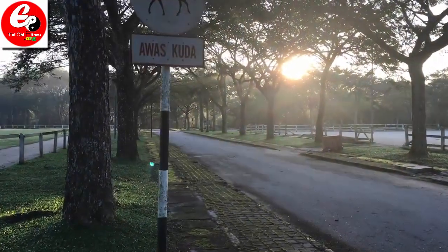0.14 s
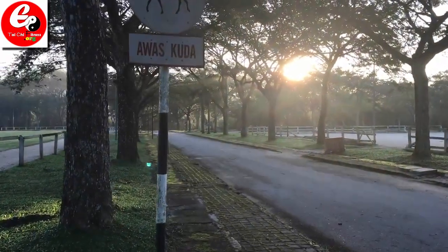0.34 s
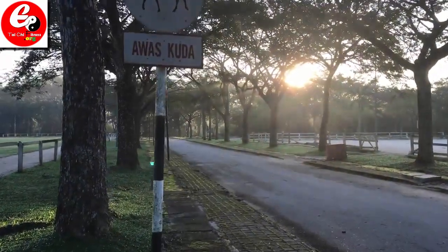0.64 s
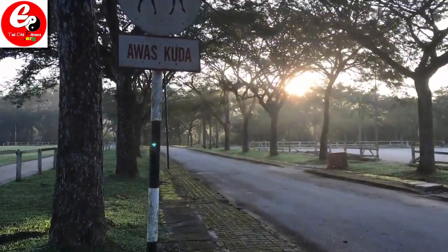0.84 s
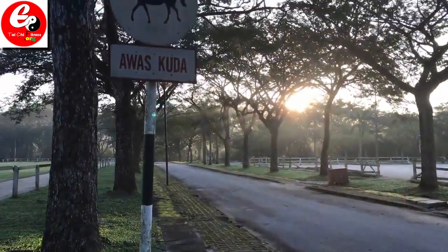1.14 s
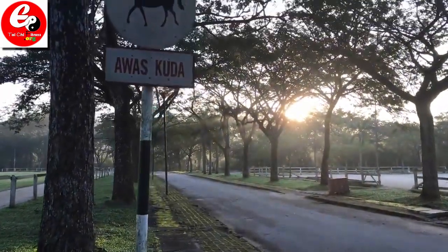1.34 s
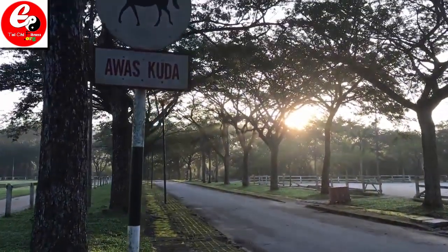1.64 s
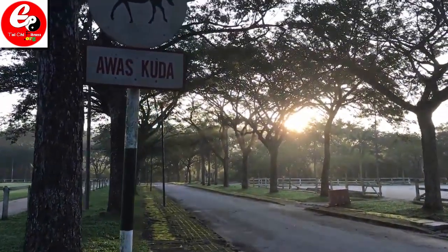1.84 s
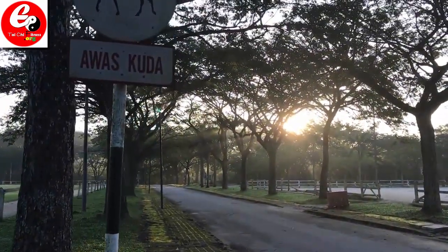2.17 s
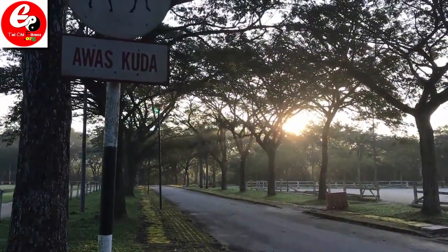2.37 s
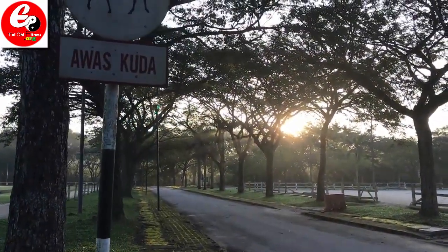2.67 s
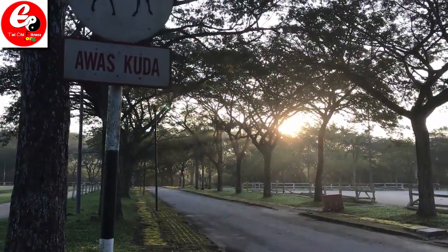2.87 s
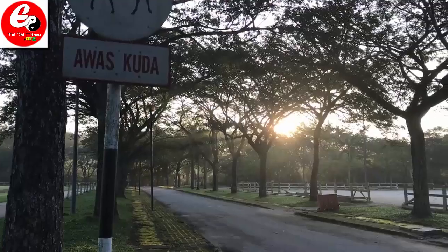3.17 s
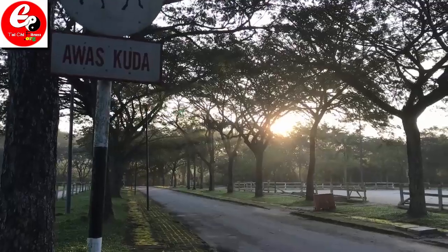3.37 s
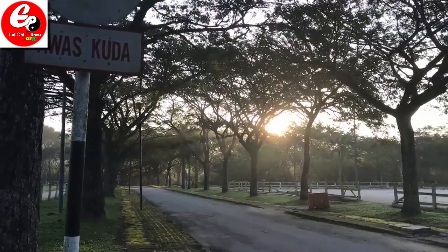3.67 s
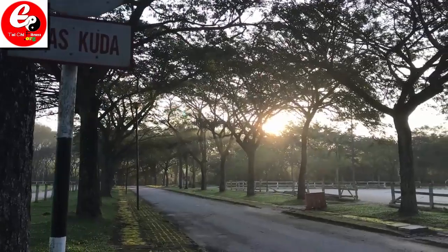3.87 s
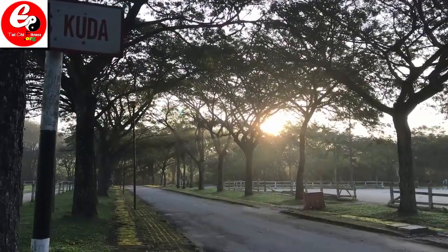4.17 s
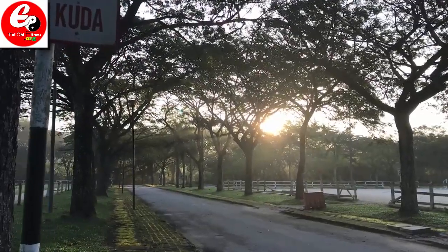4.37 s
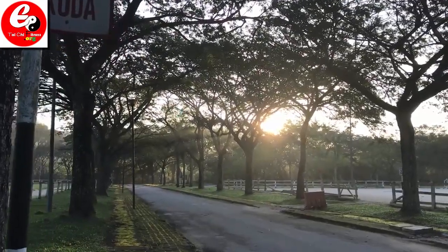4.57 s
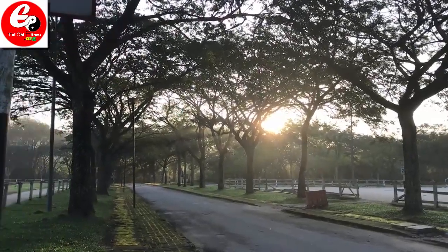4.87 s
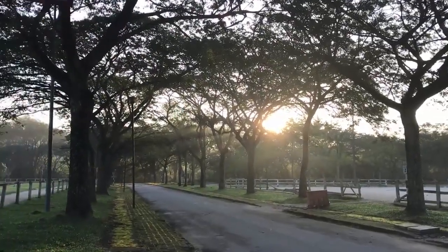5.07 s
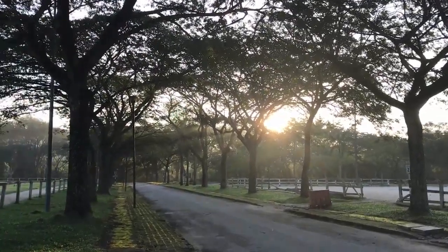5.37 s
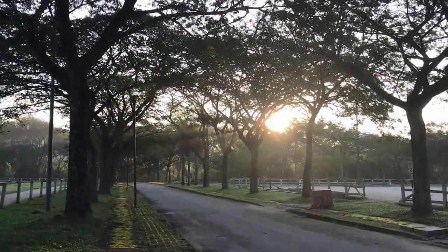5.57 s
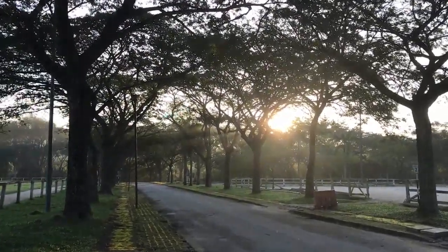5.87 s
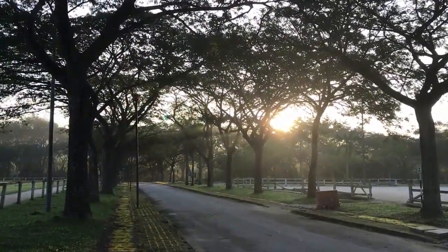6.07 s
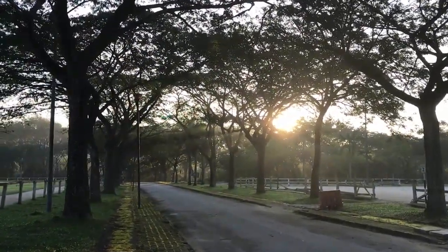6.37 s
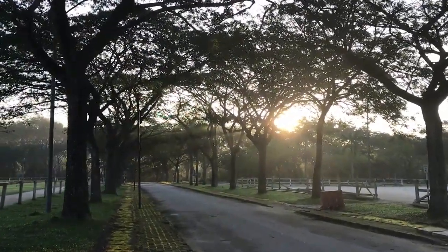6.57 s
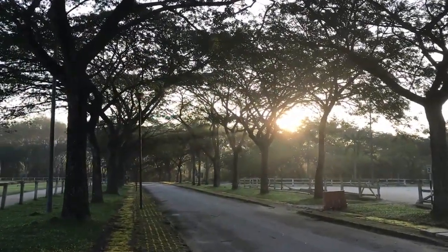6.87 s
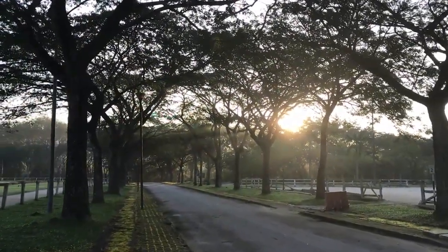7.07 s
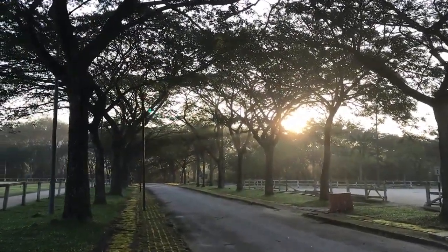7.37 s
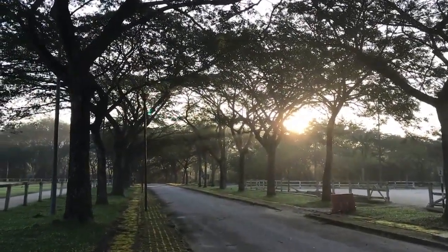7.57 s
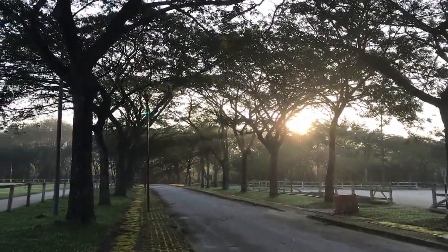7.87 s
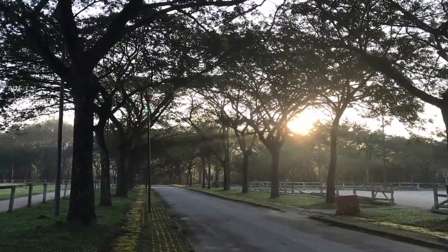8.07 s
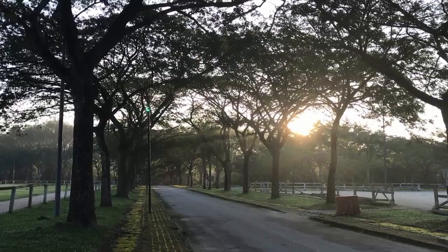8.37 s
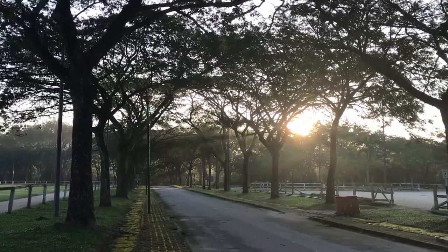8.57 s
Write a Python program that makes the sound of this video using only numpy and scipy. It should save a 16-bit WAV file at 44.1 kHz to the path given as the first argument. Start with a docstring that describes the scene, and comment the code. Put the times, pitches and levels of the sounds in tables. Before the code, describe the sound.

Dawn birdsong of short gliding whistles and chirps, near and far, with rasping bush crickets, soft air hiss, faint dry ticks and steady far traffic.

```python
"""Many small birds whistle and chirp at dawn on a tree-lined lane: gliding tones, scattered by the trees.
Two bush crickets buzz near 9 and 10 kHz, as trains of rasping wing strokes, and fall silent.
Shaped noise makes far insects that carry on, a swelling hiss near 7 kHz, open air and distant traffic.
Decaying noise bursts make small dry ticks close by and thin clicks at the top of the treble."""
import sys
import numpy as np
from scipy import signal
from scipy.fft import rfft, irfft
from scipy.io import wavfile
from scipy.ndimage import map_coordinates

SR = 44100
rng = np.random.default_rng(int(sys.argv[2]) if len(sys.argv) > 2 else 0)


def generate_wav(signal):
    """Clip the signal to [-1, 1] and save it as 16-bit WAV at the path in sys.argv[1]."""
    frames = np.transpose(np.atleast_2d(signal))
    scaled = np.clip(frames, -1, 1) * 32767
    pcm = np.round(scaled).astype(np.int16)
    wavfile.write(sys.argv[1], SR, pcm)


N = 384993
T = np.arange(N) / SR


def gain_of(db):
    """Decibels to amplitude."""
    return 10 ** (np.asarray(db) / 20)


def evened(x):
    """Scales to rms 1."""
    return x / np.sqrt(np.mean(x ** 2) + 1e-20)


def follow(rows, axis=1):
    """One column of a curve, interpolated at every sample."""
    rows = np.asarray(rows)
    return np.interp(T, rows[:, 0], rows[:, axis])


def add(mix, start_s, sound):
    """Mixes a sound in at its start time."""
    part = mix[max(round(start_s * SR), 0):][:len(sound)]
    part += sound[:len(part)]


def coloured(x, spectrum):
    """Filters by a spectrum, interpolated over log frequency, to rms 1."""
    hz, db = np.transpose(spectrum)
    f = np.fft.rfftfreq(len(x), 1 / SR)
    response = gain_of(np.interp(np.log(f + 1), np.log(hz + 1), db))
    return evened(irfft(rfft(x) * response, len(x)))


def wander(t, per_s):
    """Smooth random curve through normal knots, per_s of them a second."""
    knots = rng.standard_normal(4096)
    return map_coordinates(knots, [t * per_s], order=2, mode="wrap")


def trees(x, t60_s, wet_db, onset_s=0.0078):
    """Trunks and crowns scatter a sound into a sparse, dying tail."""
    t = np.arange(SR) / SR
    taps = rng.standard_normal(SR) * (rng.random(SR) < .06)
    tail = taps * (1 - np.exp(-t / onset_s)) * gain_of(-60 * t / t60_s)
    scattered = signal.fftconvolve(x, tail / np.linalg.norm(tail))[:N]
    return x + gain_of(wet_db) * scattered


def progress(length_s):
    """Runs from 0 to 1 over a note."""
    return np.linspace(0, 1, round(max(length_s, .01) * SR))


def whistle(glide_hz, loudest, rough, waver=0.0033, rough_waver=0.021,
            flutter_db=1.9, rough_flutter_db=3, edge=0.44, overtone_db=-38):
    """A tone follows its glide, swells and fades; roughness trembles its pitch and level."""
    t = np.arange(len(glide_hz)) / SR
    u = t / t[-1]
    hz = glide_hz * (1 + (waver + rough * rough_waver) * wander(t, 416))
    phase = 2 * np.pi * np.cumsum(hz) / SR
    half_turns = np.interp(u, [0, np.clip(loudest, .1, .9), 1], [0, .5, 1])
    swell = abs(np.sin(np.pi * half_turns)) ** edge * signal.windows.tukey(len(t), .15)
    tremble_db = flutter_db * wander(t, 63.5) + rough * rough_flutter_db * wander(t, 261)
    tone = np.sin(phase) + gain_of(overtone_db) * np.sin(2 * phase)
    return evened(swell * gain_of(tremble_db) * tone)


def sing(rows, gesture, loudest):
    """Notes that share one pitch gesture, each as (start [s], level [dB], sound)."""
    notes = []
    for start_s, length_s, hz, sweep_hz, db, rough in rows:
        glide_hz = hz + sweep_hz * gesture(progress(length_s))
        notes.append((start_s, db, whistle(glide_hz, loudest, rough)))
    return notes


def sag(u):
    """Pitch moves evenly: down for a positive sweep, up for a negative one."""
    return .5 - u


def babble(u, bends):
    """Pitch passes smoothly through a few turns: a polynomial through the bends."""
    return np.polyval(np.polyfit(np.linspace(0, 1, len(bends)), bends, len(bends) - 1), u)


def warbles(stumble_s=0.024):
    """Far birds' phrases of short syllables, each bent at random around the bird's pitch."""
    # (time [s], length [s], centre [Hz], level [dB])
    phrases = [(0.041, .24, 2836, -66), (8.56, .14, 2750, -69)]
    syllables_per_s, syllable_s, bend = 14, 0.035, 0.065
    notes, u = [], progress(syllable_s)
    for start_s, length_s, hz, db in phrases:
        for t in np.arange(0, length_s, 1 / syllables_per_s):
            glide_hz = hz * np.exp(bend * babble(u, rng.standard_normal(size=4)))
            sound = whistle(glide_hz, loudest=.45, rough=0.79)
            notes.append((start_s + t + stumble_s * rng.random(), db, sound))
    return notes


def tew(u, ledge=.57):
    """Pitch drops, rests on a ledge and drops again."""
    return (1 - u / ledge) ** 3


def arch(u, top=.35):
    """Pitch goes over an early top and comes back down."""
    return np.sin(np.pi * u ** (np.log(.5) / np.log(np.clip(top, .1, .9)))) - 1


def noise_band(length_s, hz, width_hz):
    """A soft-edged burst of noise around one pitch, at rms 1."""
    size = round(max(length_s, .02) * SR)
    band = np.exp(-.5 * ((np.fft.rfftfreq(size, 1 / SR) - hz) / width_hz) ** 2)
    noise = irfft(rfft(rng.standard_normal(size)) * band, size)
    return evened(noise * signal.windows.tukey(size, .6))


def scoop(u, bottom=0.59):
    """Pitch dips and starts back up."""
    return (1 - u / bottom) ** 2


def wee(u, top=.78):
    """Pitch climbs and just tips over the top."""
    return -(1 - u / top) ** 2


def tu_wees():
    """The nearest bird's calls: a low scoop runs straight into a rise."""
    # (time [s], scoop bottom [Hz], scoop level [dB], rise length [s], rise top [Hz], rise level [dB])
    calls = [(0.957, 3420, -65, .11, 4130, -56), (7.419, 3470, -55.5, .105, 4270, -54.5),
             (7.713, 3450, -56, .087, 4420, -53), (8.017, 3400, -54.5, 0.11, 4205, -53)]
    scoop_s, scoop_depth_hz, wee_delay_s, wee_climb_hz, rough = 0.073, 237, .065, 602, 0.074
    scoops, wees = [], []
    for start_s, bottom_hz, scoop_db, wee_s, top_hz, wee_db in calls:
        scoops.append((start_s, scoop_s, bottom_hz, scoop_depth_hz, scoop_db, rough))
        wees.append((start_s + wee_delay_s, wee_s, top_hz, wee_climb_hz, wee_db, rough))
    return sing(scoops, scoop, loudest=0.83) + sing(wees, wee, loudest=0.48)


def rise(u, knee=2.7):
    """Pitch climbs fast and levels off."""
    return -(1 - u) ** knee


def slur(u, ease=0.675):
    """Pitch falls, fastest in the middle."""
    return ease * (np.cos(np.pi * u) - 1) / 2 - (1 - ease) * u


def trill(count=16, scatter=0.0298, arch_scatter=.35, uneven_db=1.5, rough=.6):
    """A far bird's even run of up-and-down chips, uneven in pitch and strength, sinking and fading."""
    start_s, gap_s, first_db, fade_db_per_s = 2.442, .077, -66.5, 3.5
    chip_s, first_hz, arch_hz, sink_hz_per_s = 0.0389, 3116, 420, 316
    chips = []
    for t in np.arange(count) * gap_s:
        detune, height, size = rng.standard_normal(size=3)
        hz = (first_hz - sink_hz_per_s * t) * (1 + scatter * detune)
        db = first_db - fade_db_per_s * t + uneven_db * size
        chips.append((start_s + t, chip_s, hz, arch_hz * np.exp(arch_scatter * height), db, rough))
    return sing(chips, arch, loudest=1.0)


def peeps(rough=.1):
    """A small bird's thin, high peeps: the same little climbing note each time."""
    # (time [s], level [dB])
    peep_levels = [(2.618, -76), (3.182, -77), (3.712, -72), (4.93, -75)]
    length_s, top_hz, climb_hz = 0.0546, 5680, 480
    rows = [(start_s, length_s, top_hz, climb_hz, db, rough) for start_s, db in peep_levels]
    return sing(rows, wee, loudest=.6)


def rattle(count=4, duty=.75, rough=.6):
    """One short run of slurs so close together that they purr."""
    start_s, gap_s, start_hz, fall_hz, db = 6.381, 0.015, 2700, 750, -60.5
    rows = [(start_s + t, duty * gap_s, start_hz, fall_hz, db, rough)
            for t in np.arange(count) * gap_s]
    return sing(rows, slur, loudest=.5)


def birds(near_above_db=-60, near_db=0.06, far_db=0.8, farthest_db=2.5):
    """Loud notes are near and nearly dry, faint ones come through the trees, trill and warbles deepest."""
    # held whistles: (time [s], length [s], middle [Hz], sag [Hz], level [dB], roughness [0-1])
    held_notes = [(0, 0.064, 3910, 10, -57, 0.17), (0, 0.076, 3300, 260, -65.5, 0.2),
                  (4.22, 0.04, 2750, 140, -67, .2), (5.17, .28, 4180, -340, -79, 0),
                  (6.1, 0.18, 3340, 560, -68, .05), (1.364, 0.17, 3150, 259, -58, 0.16),
                  (3.822, 0.21, 2657, 330, -67.5, 0.14), (4.406, .1, 3590, 18, -55.5, 0.02),
                  (4.565, 0.13, 3350, 542, -63, .14), (5.62, .105, 3660, 300, -67.5, .05),
                  (5.924, 0.045, 3330, 10, -65, 0.14), (6.03, 0.063, 2474, 10, -64, 0.3),
                  (6.172, 0.097, 3760, 177, -56, 0.1), (6.244, 0.068, 1736, 138, -62, 0.2),
                  (6.379, 0.044, 2075, 58, -60.5, 0.5), (7.26, 0.15, 2004, 120, -68, 0.34),
                  (8.419, .155, 3165, 198, -59.5, 0.2), (8.6, .08, 2470, 60, -69, 0.1)]
    # "tew" notes: (time [s], length [s], ledge [Hz], drop [Hz], level [dB], roughness [0-1])
    tew_notes = [(.297, 0.061, 3810, 416, -54, .03), (.445, .06, 2730, 300, -65.5, 0.15),
                 (.596, 0.055, 3830, 494, -53, .05), (.738, 0.049, 2644, 300, -67, .3),
                 (2.17, 0.16, 2875, 480, -66, 0.02), (8.096, 0.13, 2875, 446, -65.5, 0.14)]
    # up and over: (time [s], length [s], top [Hz], arch height [Hz], level [dB], roughness [0-1])
    arch_notes = [(.418, 0.038, 3400, 600, -66.5, .3), (.714, .034, 3290, 553, -63, 0.4),
                  (1.532, 0.099, 3296, 193, -56.5, .25), (1.655, 0.11, 4330, 140, -65.5, 0.2),
                  (1.751, 0.16, 4116, 533, -55, 0.01), (4.248, 0.0435, 4500, 300, -63, 0.5),
                  (6.338, 0.12, 3880, 327, -56, .05), (6.672, .024, 3390, 500, -64, .3),
                  (6.915, 0.036, 3080, 400, -66, .3), (7.444, .12, 3210, 200, -62.5, .03),
                  (7.687, 0.15, 4050, 615, -56, 0)]
    # faint, hazy bands of noise, raspy calls and the blurred tails of notes:
    # (time [s], length [s], centre [Hz], width [Hz], level [dB])
    hazes = [(0.868, 0.093, 5700, 500, -76), (1.289, 0.25, 5600, 420, -75), (1.88, 0.51, 3660, 380, -68.5),
             (3.72, 0.44, 4350, 270, -75.5), (4.107, 0.1, 5700, 700, -71), (4.23, .12, 5630, 500, -77),
             (4.33, .12, 6500, 160, -78), (5.78, 0.074, 5370, 170, -77), (6.593, 0.11, 5260, 200, -77),
             (7.276, 0.095, 7200, 900, -71)]
    # climb and level off: (time [s], length [s], top [Hz], climb [Hz], level [dB], roughness [0-1])
    rise_notes = [(1.179, 0.015, 4090, 550, -62.5, .05), (3.24, .15, 3350, 198, -68, 0.1),
                  (3.49, 0.16, 3880, 598, -67, .05), (3.615, 0.11, 3020, 357, -62.5, 0.1),
                  (4.062, 0.035, 3950, 800, -62, 0.16), (4.082, .095, 4200, 320, -55.5, .12),
                  (4.891, .08, 2550, 450, -65, .4), (5.033, .22, 2990, 225.5, -59.5, .14),
                  (5.63, .09, 2560, 402, -67, .4), (5.778, .15, 4210, 697, -64.5, 0.37),
                  (6.579, .12, 2920, 516, -56, 0.84), (6.795, .13, 2840, 150, -56.5, 0.35),
                  (7.066, 0.025, 4100, 1290, -59.5, 0.7), (7.094, .025, 4030, 400, -64, .7),
                  (7.189, 0.11, 3950, 200, -59, .05), (8.389, .043, 2850, 320, -66, .05)]
    # downward slurs: (time [s], length [s], start [Hz], fall [Hz], level [dB], roughness [0-1])
    slur_notes = [(1.204, .043, 3340, 650, -63.5, .2), (1.9, 0.028, 4350, 450, -63, 0.6),
                  (2.024, 0.056, 4250, 900, -57.5, .4), (3.725, 0.1, 4800, 743, -69.5, 0.9),
                  (3.935, 0.084, 4620, 604, -70, 0.7), (4.281, 0.026, 4470, 1140, -55, 0.2),
                  (5.105, 0.043, 2850, 450, -66, .4), (5.827, .047, 3700, 900, -66, .5),
                  (5.865, 0.033, 2280, 250, -61.5, .1), (6.032, 0.063, 4990, 1600, -65, 0.9),
                  (6.924, 0.06, 2950, 507, -64, 0.5), (7.225, .059, 2450, 400, -66, .5),
                  (7.259, .094, 8400, 4200, -69, 0.9), (7.823, 0.073, 2305, 302, -64.5, 0.5),
                  (7.942, 0.058, 4120, 950, -57, 0.4), (8.269, 0.037, 3280, 380, -58, .3),
                  (8.33, .025, 2830, 400, -65, .3)]
    near, far, farthest = np.zeros((3, N))
    notes = sing(held_notes, sag, loudest=0.56) + sing(tew_notes, tew, loudest=0.67)
    notes += sing(arch_notes, arch, loudest=0.43) + tu_wees()
    notes += sing(rise_notes, rise, loudest=0.39) + sing(slur_notes, slur, loudest=0.35)
    notes += peeps() + rattle()
    for start_s, db, sound in notes:
        add(near if db > near_above_db else far, start_s, gain_of(db) * sound)
    for start_s, length_s, hz, width_hz, db in hazes:
        add(far, start_s, gain_of(db) * noise_band(length_s, hz, width_hz))
    for start_s, db, sound in trill() + warbles():
        add(farthest, start_s, gain_of(db) * sound)
    near = gain_of(near_db) * trees(near, t60_s=0.73, wet_db=-11.0)
    far = gain_of(far_db) * trees(far, t60_s=0.83, wet_db=-4.0)
    farthest = gain_of(farthest_db) * trees(farthest, t60_s=0.51, wet_db=-3.0)
    return near + far + farthest


def far_chorus(count=300, centre_hz=2760, spread=.125, slide=.075, uneven_db=2.5, trim_db=-3.0):
    """Many far birds: short, rough, randomly bent notes, blurred by the wood."""
    # how busy the chorus is: (time [s], level before trim [dB])
    chorus_levels = [(0, -58.5), (.7, -67), (1.2, -64.5), (2.1, -64), (2.8, -68), (3.6, -74), (4.3, -63),
                     (4.9, -62.5), (5.4, -70.5), (5.9, -64), (6.7, -61), (7.3, -62.5), (8.0, -69),
                     (8.7, -80)]
    out = np.zeros(N)
    for k in range(count):
        place, length_s = rng.random(), rng.uniform(0.0216, 0.0605)
        voice, size, *bends = rng.standard_normal(5)
        bend = spread * np.clip(voice, -2, 2) + slide * babble(progress(length_s), bends)
        note = whistle(centre_hz * np.exp(bend), 0.23, rough=0.44)
        add(out, (k + place) / count * N / SR, gain_of(uneven_db * min(size, 1)) * note)
    blurred = evened(trees(out, t60_s=0.36, wet_db=-4.0))
    return gain_of(follow(chorus_levels) + trim_db) * blurred


def stridulate(per_s, hz, fall, width, jitter, scrape, uneven_db):
    """Each wing stroke drags a scraper over a file: a short rasping tone that falls as the wing slows."""
    # wing response around a stroke: (frequency [Hz], relative level [dB])
    wing_response = [(7600, -26), (8600, 0.5), (9800, 2), (10500, -6), (11600, -5.5), (12600, -15),
                     (15000, -28)]
    turns = np.cumsum(per_s * (1 + jitter * wander(T, 120))) / SR
    u, stroke = turns % 1 - .5, turns.astype(int)
    size, detune, start = rng.standard_normal((2000, 3))[stroke % 2000].T
    gate = np.exp(-.5 * (u / width) ** 2) * np.cos(np.pi * u) ** .5 * gain_of(uneven_db * size)
    phase = 2 * np.pi * (np.cumsum(hz * (1 - fall * u + .008 * detune)) / SR + start)
    tone = evened(gate * np.sin(phase))
    noise = evened(gate * coloured(rng.standard_normal(N), wing_response))
    return evened(tone + scrape * noise)


def crickets():
    """One cricket buzzes steadily; a lower one throbs about six times a second."""
    # steady cricket: (time [s], level before trim [dB], wing resonance [Hz])
    steady_song = [(0, -60, 9900), (.7, -61.5, 10010), (1.35, -61.5, 9700), (2.4, -61, 9710),
                   (3.7, -61, 9760), (3.85, -61.5, 9600), (4.28, -64, 9620), (4.62, -60.5, 9570),
                   (5.3, -66, 9600), (5.9, -66.5, 9630), (6.3, -73, 9660), (6.7, -105, 9660)]
    # its wing strokes: (time [s], rate [strokes/s])
    stroke_rates = [(0, 126), (2, 121), (2.8, 115), (4.75, 137), (5.05, 119.5), (6.4, 120)]
    # lower cricket: (time [s], level before trim [dB])
    lower_levels = [(0, -72.5), (1.5, -73), (4, -71), (5.3, -70), (5.72, -76), (5.82, -97)]
    steady = stridulate(follow(stroke_rates), follow(steady_song, axis=2), fall=0.22, width=0.17,
                        jitter=.04, scrape=0.29, uneven_db=-1.5)
    steady = steady * gain_of(follow(steady_song) - 1.0)
    throb = (1 + np.cos(2 * np.pi * 5.95 * T)) / 2
    lower = stridulate(116, 8850, fall=0.15, width=0.18, jitter=.06, scrape=.25, uneven_db=2.5)
    lower = evened(lower * throb ** 0.44) * gain_of(follow(lower_levels) + 1.0)
    return trees(steady + lower, t60_s=0.073, wet_db=-6.0, onset_s=0.0035)


def swelling_insect(hz=7080, width_hz=170, droop_share=.07, count=6):
    """A thin, distant hiss whose pitch arches as it swells, every 1.4 s or so, fainter each time."""
    every_s, swell_s, first_db, fade_db_per_s = 1.385, 1.3, -80, 0.6
    out = np.zeros(N)
    for start_s in np.arange(count) * every_s:
        hiss = signal.hilbert(noise_band(swell_s, hz, width_hz))
        droop_hz = hz * droop_share * np.linspace(-1, 1, len(hiss)) ** 2
        # frequency shift down by the droop
        shifted = (hiss * np.exp(-2j * np.pi * np.cumsum(droop_hz) / SR)).real
        add(out, start_s, gain_of(first_db - fade_db_per_s * start_s) * shifted)
    return out


def background(traffic_db=-43.5, air_db=-67, insects_db=-67.0):
    """Shaped noise: far-off traffic, a soft hiss of open air, and the blended buzz of distant insects."""
    # spectra: (frequency [Hz], relative level [dB])
    traffic_spectrum = [(15, -65), (25, -37), (38, -12.5), (60, 0), (95, -1.5), (122, .5), (172, -4),
                        (250, -12), (342, -17.5), (482, -26.5), (700, -25.5), (1030, -21.5), (1320, -24),
                        (1900, -34.5), (2500, -51), (4200, -110)]
    air_spectrum = [(900, -9.5), (1800, 0), (2800, -2), (4000, -4), (5000, -11), (6500, -9.5), (7800, -14),
                    (11500, -18), (13000, -19.5), (15200, -22)]
    insect_spectrum = [(6000, -38), (7700, -39), (8200, -16), (8700, -4.5), (9300, -0.5), (9900, 0),
                       (10400, -10), (11200, -14), (12500, -36)]
    traffic = gain_of(traffic_db) * coloured(rng.standard_normal(N), traffic_spectrum)
    air = gain_of(air_db) * coloured(rng.standard_normal(N), air_spectrum)
    buzz = coloured(rng.standard_normal(N), insect_spectrum)
    insects = gain_of(insects_db + 0.38 * wander(T, 200)) * buzz
    return traffic + air + insects


def ticks(decay_s=0.0027, size=1024, trim_db=3.5):
    """Tiny dry ticks: a low knock and a bright snap of noise, decaying together."""
    # levels before decay and trim: (time [s], knock level [dB], snap level [dB])
    tick_levels = [(.982, -68, -55), (2.173, -67, -58), (2.671, -65, -65), (2.858, -58, -61),
                   (4.212, -50.5, -78), (4.476, -67, -54), (4.873, -52, -68), (4.9, -52.5, -69),
                   (4.975, -47.5, -54), (4.986, -58, -63), (5.433, -55, -61), (5.538, -58, -57),
                   (6.477, -61, -52.5), (6.522, -52.5, -60), (6.783, -46.5, -72), (6.892, -59, -62),
                   (6.989, -53, -57), (7.238, -49, -64)]
    # spectra: (frequency [Hz], relative level [dB])
    knock_spectrum = [(300, -30), (1000, -6), (2200, 0.5), (3500, -9.5), (6000, -29), (15000, -45)]
    snap_spectrum = [(1500, -9), (4200, -1.5), (6800, -6), (9000, -10), (15000, -16)]
    out, t = np.zeros(N), np.arange(size) / SR
    for start_s, knock_db, snap_db in tick_levels:
        knock_noise, snap_noise = rng.standard_normal((2, size))
        knock = gain_of(knock_db) * coloured(knock_noise, knock_spectrum)
        snap = gain_of(snap_db) * coloured(snap_noise, snap_spectrum)
        add(out, start_s, (knock + snap) * np.exp(-t / decay_s))
    return gain_of(trim_db) * trees(out, t60_s=0.073, wet_db=-3)


def clicks(decay_s=0.00063, trim_db=-1, size=256):
    """Faint, pin-sharp clicks: treble noise with a decay constant under a millisecond."""
    # (time [s], level before decay and trim [dB])
    click_levels = [(4.3505, -49), (4.4069, -57), (5.9898, -47), (6.1644, -53), (6.6857, -58)]
    # (frequency [Hz], relative level [dB])
    click_spectrum = [(6000, -30), (10000, -10), (13000, 7), (15400, -2)]
    out, t = np.zeros(N), np.arange(size) / SR
    for start_s, db in click_levels:
        burst = coloured(rng.standard_normal(size), click_spectrum)
        add(out, start_s, gain_of(db + trim_db) * burst * np.exp(-t / decay_s))
    return out


def scene():
    """Everything heard from the side of the lane, in one channel."""
    living = birds() + far_chorus() + crickets() + swelling_insect()
    return (living + background() + ticks() + clicks())[None]


def record(dry):
    """The recorder's band limit: a linear-phase low-pass."""
    edge_hz = 15400
    lowpass = signal.firwin(511, edge_hz, window=("kaiser", 9), fs=SR)
    return signal.oaconvolve(dry, lowpass[None], "same")


dry = scene()
out = record(dry)
generate_wav(out)
```